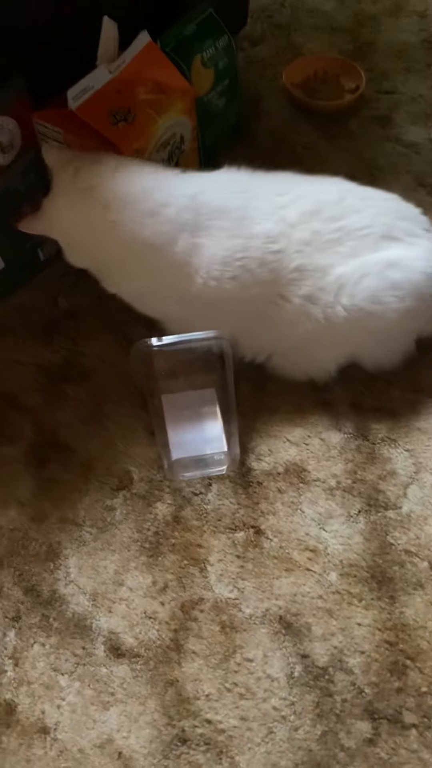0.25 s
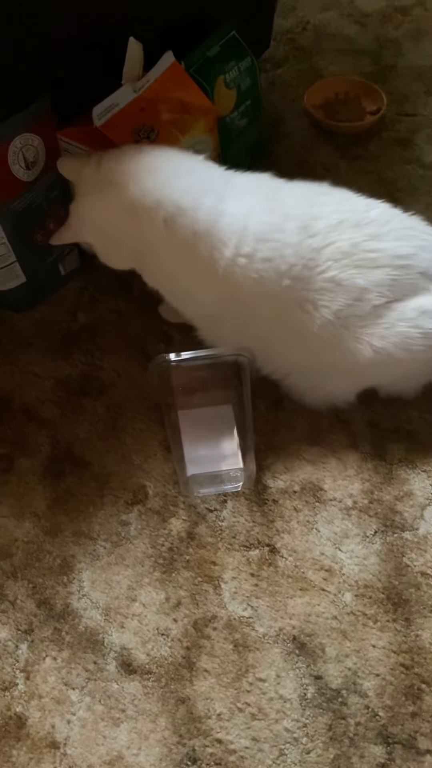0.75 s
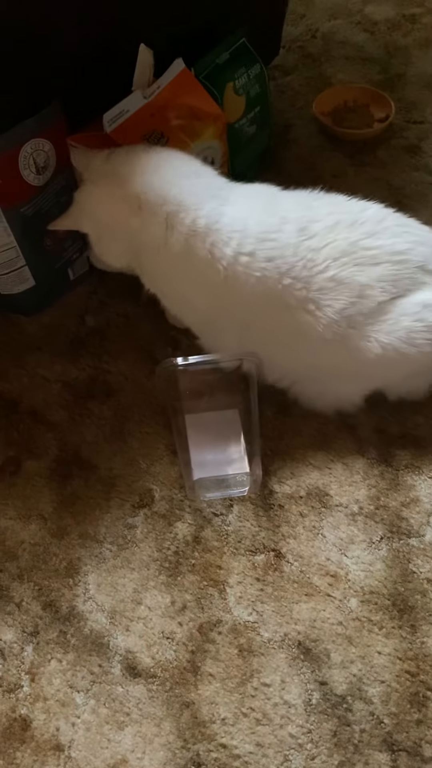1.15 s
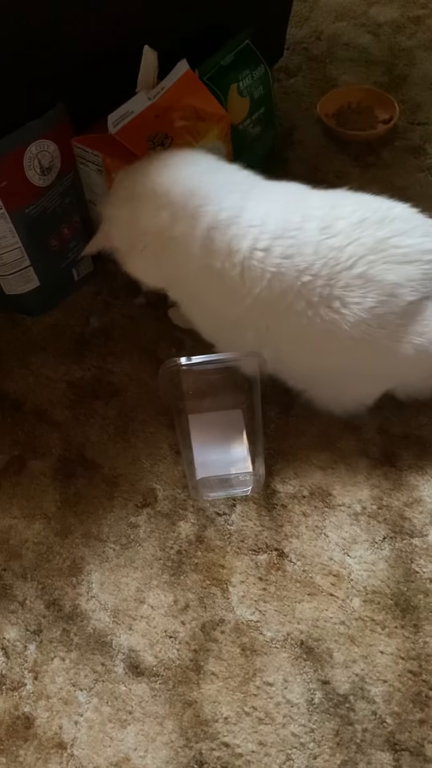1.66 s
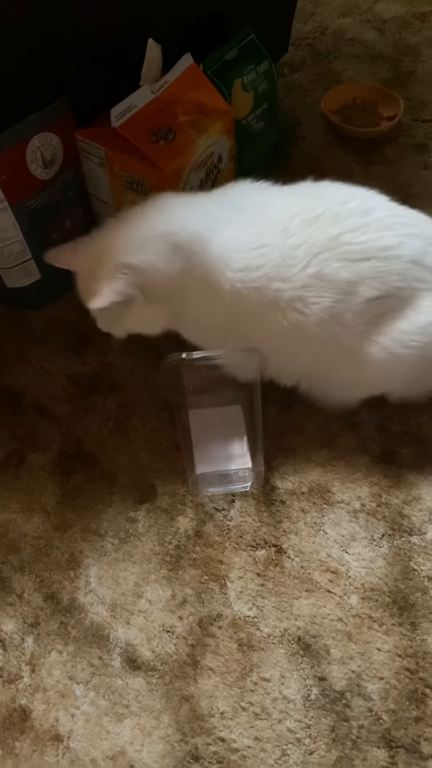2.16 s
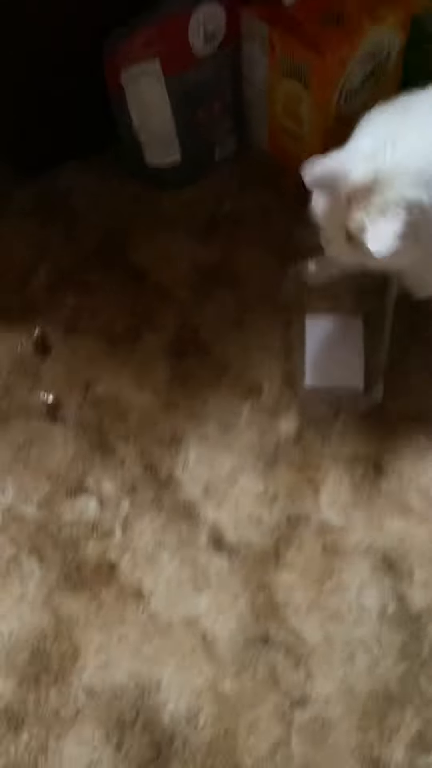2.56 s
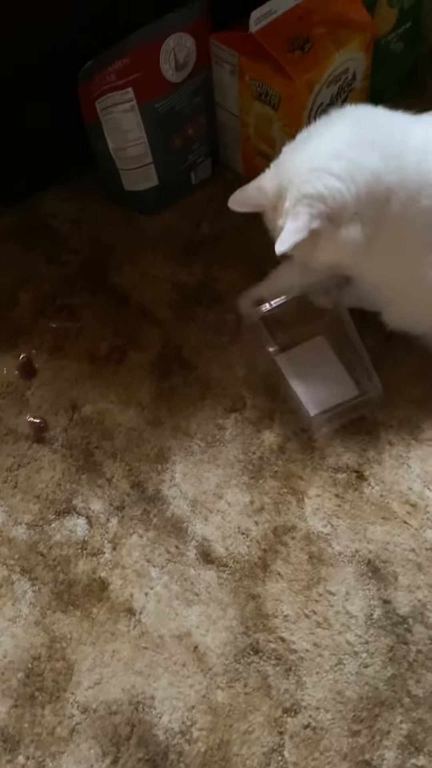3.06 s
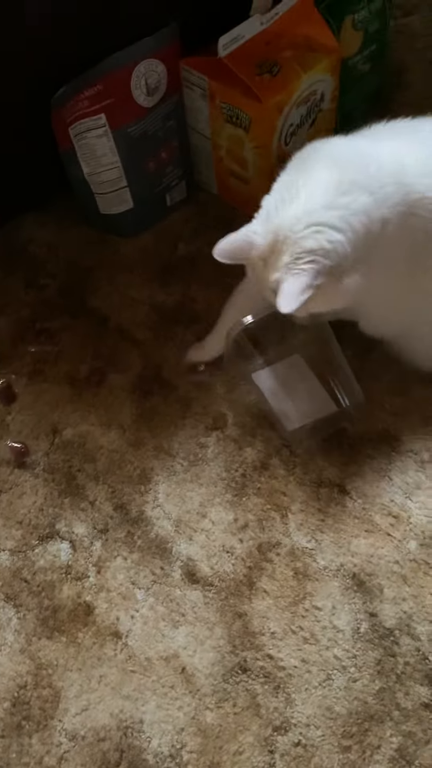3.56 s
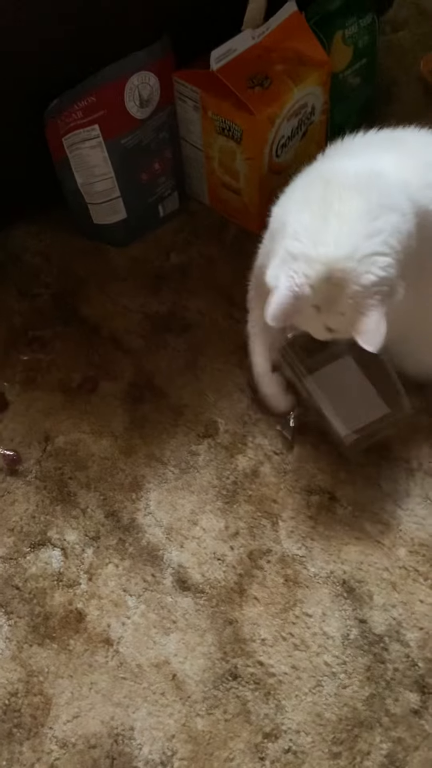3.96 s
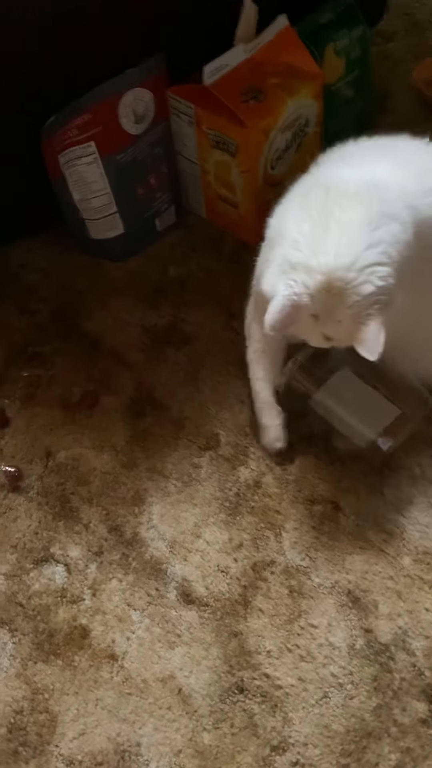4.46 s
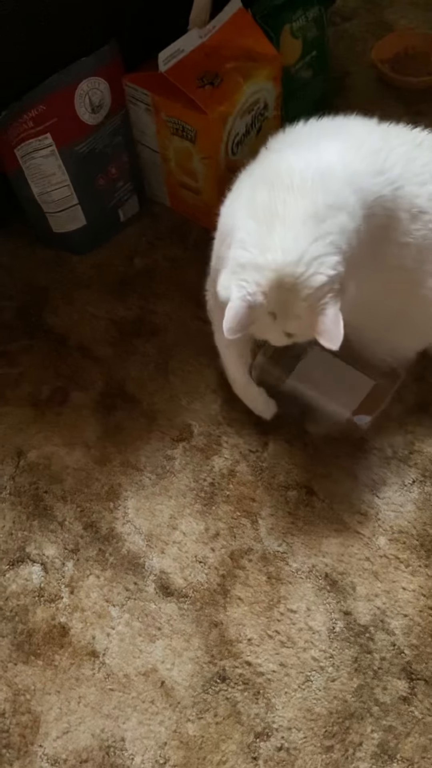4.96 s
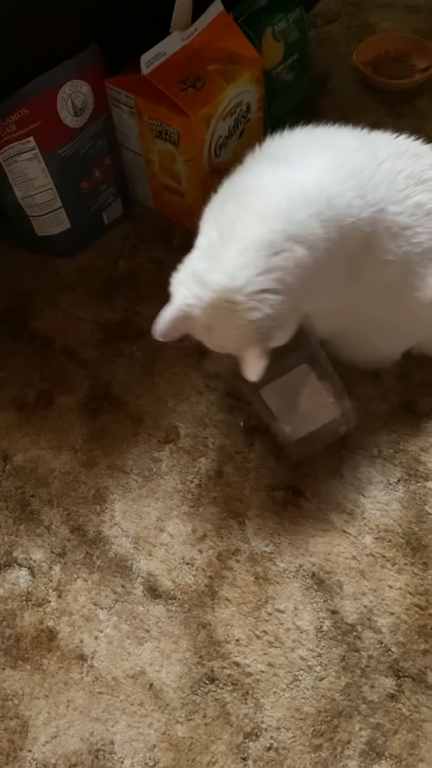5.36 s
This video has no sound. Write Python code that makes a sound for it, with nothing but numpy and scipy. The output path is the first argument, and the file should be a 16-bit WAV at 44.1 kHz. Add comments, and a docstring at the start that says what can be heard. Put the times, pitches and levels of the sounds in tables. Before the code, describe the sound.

A cat rummages among snack bags in a quiet room, heard close through a phone. A couple of crackles, a near pause, then dense crisp crinkling with faint paw bumps on a thin plastic box. It thins out before one loud, hard clack with a brief rattle. After a short lull, crackling and soft taps return, then fade into light rubbing over a low room tone.

```python
"""Close to a phone in a quiet room, a cat noses among snack bags: creases snap singly and in clumps as noise bursts.
From 0.7 s it also paws softly at a thin plastic box on the carpet: decaying sines for the walls and the bottom.
At 2.84 s comes one hard knock with a claw's crack, two low tones and a rattle, then a short lull in the film.
From 3.2 s film and soft bumps return; from 4.85 s fur and pads rub the box until the end.
Throughout, the walls reflect, fixed stereo processing sets left against right, and a noise room tone lies below."""
import sys
import numpy as np
from scipy import signal
from scipy.fft import rfft, irfft, next_fast_len
from scipy.io import wavfile
from scipy.ndimage import uniform_filter1d

SR = 44100
rng = np.random.default_rng(int(sys.argv[2]) if len(sys.argv) > 2 else 0)


def pcm_store(signal):
    """Save signal as 16-bit PCM."""
    levels = np.round(np.clip(np.atleast_2d(signal), -1, 1) * 32767)
    wavfile.write(sys.argv[1], SR, levels.astype(np.int16).T)


N = 246959  # samples, 5.6 s

# Creases that snap, and one rattle just after the hard knock (at 2.874 s): (time of the peak [s], level [dB],
# share under 2.5 kHz [dB], share over 6 kHz [dB], pitch of the ring [Hz])
SNAPS = [(0.0039, -26.5, -25, -20, 3830), (0.048, -35.5, -13, -6, 4900), (0.065, -40, -23, -9.5, 3800),
         (0.086, -38, -2, -7, 1480), (0.143, -49.5, -13, -16, 2050), (0.4902, -40, -22, -2, 2400),
         (0.4929, -39.5, -5.5, -11, 1260), (0.5226, -52, -5, -3, 1400), (0.7427, -30, -12, -13, 3580),
         (0.7475, -32.5, -8, -6, 1390), (0.7535, -28.5, -4.5, -4, 4690), (0.7583, -28, -20, -16, 4580),
         (0.7657, -34, -15, -11, 7620), (0.7742, -40, -15, 1, 4930), (0.7881, -37, -13, -8, 7390),
         (0.7939, -36.5, -8, -5, 5210), (0.8053, -35.5, -10, -8, 8940), (0.8123, -33, -27, -2, 2870),
         (0.8308, -32, -7.5, -1.5, 4670), (0.9009, -26.5, -5.5, -6.5, 1420),
         (0.9212, -26, -7.5, -3.5, 3900), (0.9442, -32, -31, -2, 8250), (0.97, -32.5, -6, -11, 2830),
         (0.9779, -45, -15, -8, 5050), (1.0259, -36, -14, -16, 4430), (1.0329, -32.5, -4, -11, 4750),
         (1.0475, -36.5, -2.5, -15, 3370), (1.051, -41, -13, -7, 3000), (1.0665, -44, -17, -2, 7410),
         (1.0797, -36, -5, -10, 1460), (1.1013, -42, -8, -3, 4780), (1.109, -29.5, -10, -1, 4570),
         (1.1236, -42, 5, -10, 1290), (1.1406, -41, -16, -1, 4910), (1.1524, -34.5, 11, -15, 1060),
         (1.1916, -32, -5, -3, 1190), (1.199, -34.5, -11, -3, 3300), (1.22, -38.5, -2, 3, 1190),
         (1.2256, -31, -7, -11, 5200), (1.2605, -39, -22, 4.5, 5830), (1.2834, -35.5, -8, -1, 8000),
         (1.2994, -24, -10, -3, 5460), (1.3084, -28.5, -7, 0, 1400), (1.3137, -36, -1, -4, 1440),
         (1.394, -36, -4, 3, 2230), (1.4793, -38, -7, -2, 4800), (1.503, -44, -13, 0, 7970),
         (1.5098, -37, -16, -1, 7600), (1.513, -37.5, -4, 1, 7400), (1.5327, -39, -15, 2, 8610),
         (1.5439, -38, -5, -1, 6890), (1.5549, -36.5, -4, 0.5, 6780), (1.565, -37, -1, 3, 7540),
         (1.581, -36, -3, 9, 1510), (1.5855, -29, -2, -2.5, 7750), (1.6016, -32, -8, 0, 8680),
         (1.618, -23.5, -4, 6, 9000), (1.6402, -42, 6, -4, 5000), (1.645, -34, -3.5, -5, 7740),
         (1.6564, -33.5, -5, -2, 7880), (1.661, -37, -6, 4, 1360), (1.679, -40, -26, -7, 7970),
         (1.684, -39, -28, 0, 5960), (1.71, -32, -15, -1.5, 5040), (1.7168, -32, -10.5, 0, 5490),
         (1.746, -35, -8, -1, 1490), (1.7527, -38, -29, 1, 8120), (1.766, -26, -8, -8.5, 7400),
         (1.783, -44.5, -9, -9, 1940), (1.8171, -22.5, -28, 1, 8700), (1.85, -37, -18, 2, 4610),
         (1.8591, -37, -10, -3, 4440), (1.8658, -32, -5, -3, 4600), (1.8906, -35, -8, -1.5, 4240),
         (1.905, -36.5, -10, -4, 9800), (1.948, -55, -2, -17, 1350), (1.984, -37.5, -4, -15, 1750),
         (1.9952, -29.5, -3, 0, 1560), (2.0045, -21.5, 1.5, 4, 2700), (2.04, -29, -10, -0.5, 1630),
         (2.1247, -37.5, -11, 0, 7100), (2.1382, -39.5, -2, -1, 2000), (2.1577, -39.5, -13, 1, 5340),
         (2.182, -43.5, -11, -2, 5300), (2.2447, -46.5, -6, -3.5, 7240), (2.2663, -51, 5, -16, 4110),
         (2.2725, -39, -6, -2, 2750), (2.2964, -49, -4, -3, 3160), (2.4322, -44.5, -6, -2, 1450),
         (2.4518, -35.5, -5, 6, 4840), (2.4634, -44, -3, -3.5, 2170), (2.524, -45.5, -7, 2, 4850),
         (2.538, -53.5, -8, 3, 5500), (2.649, -49, -18, -7, 3960), (2.709, -53, 3, -6, 1204),
         (2.7742, -28, -6, -2.5, 5330), (2.7847, -25, -11.5, 0, 7100), (2.79, -26, -4, -9, 1380),
         (2.7952, -35, -4, -1, 1240), (2.8133, -25, -11, 0, 5280), (2.8229, -30, -15, 0, 8950),
         (2.874, -28, -10, -2.5, 710), (3.2351, -40, -10, -2.5, 3785), (3.2655, -50, -10.5, -16.5, 2260),
         (3.303, -39.5, -8.5, -12, 7280), (3.313, -41.5, -15, -7, 7800), (3.3395, -39.5, -5.5, -2.5, 3850),
         (3.464, -34, -2.5, -18, 1185), (3.4683, -31, -20, -17, 5550), (3.4826, -29, -11, -20, 1240),
         (3.496, -34.5, -20, -7, 5650), (3.5051, -34, -15, -2, 8300), (3.5104, -34, -3.5, 0, 5400),
         (3.5646, -26, -11, -4, 5500), (3.603, -27, -7.5, -5.5, 6050), (3.61, -28, -6, -1, 5530),
         (3.6213, -28, -7, -8, 5700), (3.6339, -32.5, -5, -12, 1300), (3.6396, -33, -10, -6, 5160),
         (3.6453, -26, -14, 1, 5840), (3.6548, -27.5, -2.5, -8, 3300), (3.669, -29, -14, -7, 5400),
         (3.698, -34, -11, -1, 830), (3.745, -34.5, -22, -0.5, 6480), (3.7495, -40, -17, 1, 6290),
         (3.7547, -33, -17, -2, 3380), (3.7642, -39.5, -15, -9, 2800), (3.782, -26.5, -20, -2, 9500),
         (3.7879, -30, -15, -2, 2520), (3.794, -30, -3.5, -16, 2600), (3.802, -30.5, -13, 0.5, 10000),
         (3.8146, -32, -8, -2, 6960), (3.8305, -35, -18, 3, 7240), (3.837, -22.5, -7, -0.5, 710),
         (3.843, -27, -32, -7, 6940), (3.8532, -27, -15, -7, 7850), (3.8661, -41, -17, 4, 8100),
         (3.8717, -31.5, -8, -2.5, 2070), (3.8812, -35, -14, 2, 8480), (3.899, -34, -16, -2, 4080),
         (3.9046, -33.5, 1, -1, 1400), (3.9297, -36.5, -5, -8, 1360), (3.9414, -36.5, -3, -1, 2690),
         (3.9863, -29.5, -6.5, -4.5, 2630), (3.9929, -29.5, -20, 8, 4570), (3.9983, -32.5, -15, -0.5, 7650),
         (4.0111, -27.5, -2.5, -5, 1220), (4.018, -29, -10, -2, 8500), (4.0353, -26.5, -4, -3, 9400),
         (4.0592, -36, -8, -2, 4440), (4.066, -33.5, -2, 2, 7920), (4.079, -26, -8, -2, 4460),
         (4.1223, -33, -1.5, 2, 1400), (4.1947, -33, -28, -3, 7750), (4.206, -26, -6.5, -1, 3270),
         (4.275, -30.5, 3, -7, 1320), (4.293, -39, -2, -2, 2700), (4.307, -37, -7, -6, 3100),
         (4.3119, -31, -7, 0, 1400), (4.3305, -31.5, -5, -5, 7800), (4.364, -36, -20, 1.5, 7700),
         (4.3725, -42, -5.5, -2, 8420), (4.3892, -37.5, -14, -8, 7750), (4.4026, -31.5, -7, 1, 1340),
         (4.411, -23.5, -1.5, -5.5, 7960), (4.4155, -25.5, -19, -16, 4400),
         (4.4396, -27.5, -26, -1.5, 8030), (4.4501, -39, -14, -4, 710), (4.4652, -36, -13, 0, 7550),
         (4.4784, -37, -12, -10, 3980), (4.4875, -40.5, 6, -11, 2260), (4.492, -27, -0.5, 1.5, 8300),
         (4.5132, -40, -13, -11, 4070), (4.5241, -27.5, -21, -1.5, 8600), (4.556, -40.5, -2, -13, 3200),
         (4.5977, -40.5, -22, -2, 7970), (4.6342, -41, 0, -14.5, 1360), (4.646, -30.5, -4.5, -3, 5400),
         (4.6784, -37, -12, -2, 8200), (4.7028, -37, -20, -4, 2860), (4.7113, -31, -6.5, -9, 3960),
         (4.717, -31.5, -25, -1.5, 3870), (4.7245, -36, -1, -3, 700), (4.7304, -39.5, -8, -1, 8030),
         (4.748, -30.5, -19, -1, 7360), (4.7572, -34, -21, -4, 6740), (4.7656, -32, -9.5, -1, 3200),
         (4.7965, -28, -10, -2.5, 8500), (4.8059, -34, -7, -9, 8100), (4.8147, -24.5, -9.5, -6, 3980),
         (4.8343, -38, -16, 5, 8590), (4.8534, -42, -9, -2.5, 3120), (4.864, -37, -8.5, -1.5, 3290),
         (4.8713, -41.5, -16, 2, 2690), (4.8976, -38.5, -11, -1, 3980), (4.9056, -37, -6, -8, 8050),
         (4.916, -35, -3, -3, 1370), (4.9308, -47, -10, -11, 6720), (4.948, -33.5, -13, -5, 3900),
         (4.9567, -28.5, -5.5, -5, 7600), (4.965, -29.5, -8, -2, 7360), (4.9892, -42.5, -10, -2, 710),
         (4.9945, -46, -8, -3, 2370), (5.024, -43, -18, -2, 5560), (5.0424, -54, 1, -11, 1390),
         (5.0764, -43, -3.5, -2, 4270), (5.0817, -41.5, -15, -4, 8300), (5.098, -39.5, -18.5, 7, 8750),
         (5.109, -40, -6, -4, 3560), (5.145, -47, 6, -13, 800), (5.165, -47, -20, -13, 5130),
         (5.181, -51, 4, -3, 1340)]
# Handfuls of film crushed at once: (time of the peak [s], level [dB], length [ms], brightness [dB per octave])
CRUMPLES = [(0.002, -39, 24, -2.5), (0.753, -49, 37.8, 0), (0.831, -63, 9.8, 7), (0.914, -41, 26.4, -1.5),
            (0.974, -54.5, 38, 0), (1.028, -46.5, 36.6, 0.5), (1.087, -44, 24, -1), (1.155, -50.5, 50, -1),
            (1.193, -41.5, 14.5, -2), (1.224, -49, 14, 2.5), (1.304, -40.5, 31.3, -1),
            (1.419, -53.5, 60, -2), (1.518, -44.5, 19, 2.5), (1.6, -47.5, 57, 0), (1.651, -49.5, 23, 5),
            (1.682, -55.5, 84, 6.5), (1.751, -46, 50, 1), (1.855, -39, 24.5, 1), (1.997, -42, 26, 0),
            (2.041, -43, 11, -1.5), (2.142, -49, 21, 0), (2.268, -62, 9, 5), (2.451, -51.5, 41.7, -2.5),
            (2.499, -60, 23, -1), (2.535, -67, 19, -6), (2.644, -61.5, 22, 1.5), (2.696, -64, 44, -1.5),
            (2.798, -38, 46, -1), (3.239, -70.5, 15, 2), (3.306, -62.5, 58, 0), (3.477, -45, 41, 0.5),
            (3.566, -56, 13, -3), (3.65, -43, 75, -0.5), (3.767, -62, 41, -3.5), (3.803, -47.5, 44, 0),
            (3.851, -42.5, 72, -1.5), (3.903, -45, 11, 1), (4.009, -43, 39.5, -1.5),
            (4.202, -39.5, 19.4, 0.5), (4.312, -48.5, 29, 0), (4.41, -40, 21.5, -0.5),
            (4.493, -45.5, 84, 0), (4.644, -45, 37.6, -1), (4.711, -49.5, 49, 0.5), (4.754, -55, 13, 7),
            (4.815, -46.5, 41, 0), (4.926, -44.5, 16, 2), (4.963, -53, 21, 0.5), (5.079, -67, 9.3, 2),
            (5.164, -59.5, 45, 4), (5.251, -63.5, 60, 1)]
# Faint rustle under everything: (time [s], level [dB])
RUSTLE = [(0, -47.5), (.11, -72), (.2, -105), (.68, -82), (.78, -82), (1.35, -62), (1.7, -57.5),
          (1.97, -73), (2.25, -76.5), (2.4, -86.5), (2.46, -66.5), (2.75, -78.5), (2.87, -44), (3.12, -80),
          (3.43, -76), (3.7, -59), (4.15, -69.5), (4.5, -63), (5.29, -66.5), (5.37, -76), (5.6, -68.5)]
# Colour of the film: (frequency [Hz], level [dB per Hz])
CRINKLE = [(200, -8.5), (350, -5.5), (600, -3.5), (900, -5.5), (1300, -3.5), (2000, -2.5), (2800, -1),
           (4000, 0), (5500, -3), (7500, -1), (10000, -5.5), (13000, -7), (15500, -14)]
# Pitch ranges of the tiny creases, each of which favours one: (frequency [Hz])
CREASE_HZ = [1400, 2700, 4840, 8100, 10300]
# Blows on the box: (time [s], strength [dB], drum of the bottom [dB], contact [ms], main wall mode [Hz],
# bottom [Hz], damping by the paw [factor on the speed of decay])
BUMPS = [(0.748, -44, -12.5, 2.3, 527, 127, 1.6), (0.9, -37, -15, 2.4, 546, 125, 5.1),
         (1.078, -58.5, 3.5, 1.4, 500, 122, 1.1), (1.189, -54, -7, 1.9, 514, 126, 1.8),
         (1.298, -39, -7.5, 4.3, 533, 141, 2.8), (1.52, -42, -14.5, 3.6, 543, 123, 3.6),
         (1.739, -55, 3, 1.4, 554, 119, 2.3), (1.846, -46, -7, 2.9, 527, 118, 2.1),
         (2.002, -37, -27, 0.77, 543, 125, 4.7), (2.043, -55, -25, 3, 488, 125, 3.8),
         (2.432, -48.5, -5, 5.3, 500, 119, 0.97), (2.773, -33, -29, 4.1, 525, 123.5, 2.8),
         (2.8436, -6.5, -29, 1.0, 520, 127, 1.0), (2.889, -23.5, -24, 1.2, 521, 127, 1.2),
         (2.984, -57, 12, 1.5, 505, 161.6, 0.91), (3.644, -42.5, -0.5, 2.9, 514, 127.4, 0.66),
         (3.811, -31.5, -4.5, 1.1, 526, 125.2, 2), (4.203, -48.5, -2.5, 0.76, 518, 123, 1),
         (4.403, -41, -13, 0.64, 507, 121.6, 0.63), (4.45, -39.5, -11.5, 0.66, 559, 153, 1.56),
         (4.682, -47, -2, 0.93, 514, 121, 3.2), (4.896, -57, -26, 1, 575, 123, 1.3),
         (5.1445, -39.5, -31, 0.2, 544, 109.7, 3.1), (5.2343, -43.5, -26.5, 0.49, 518, 118.5, 1.8),
         (5.305, -47.5, -22.5, 1.5, 517, 122, 1.7), (5.521, -65, 11, 1.4, 517, 92, 1.6)]
# Modes of the box walls before the paw shifts them: (frequency [Hz])
BOX_HZ = [318, 382, 427, 468, 520, 586, 665, 780, 912, 1034, 1660, 2100, 3300, 5300, 6600]
# Strength and undamped ring of those modes: (level [dB], t60 [s])
BOX_RING = [(-14, .15), (-11, 0.064), (-2, 0.16), (-9, 0.14), (0, 0.09), (0.5, 0.13), (2, 0.04), (4, 0.035),
            (-1, 0.045), (-10, 0.08), (-15, 0.018), (-13, .02), (-7.5, .012), (-6.5, .012), (-6, .01)]
# Colour of the many small wall modes, merged: (frequency [Hz], level [dB per Hz])
THUD = [(150, -33), (260, -36), (400, -14), (600, 2.5), (800, 0.5), (1200, -12), (5000, -38.5)]
# Claw meets the wall of the box: (time of the peak [s], peak level [dB], decay [ms])
CRACK = (2.8447, -3, 1.5)
# Colour of that crack: (frequency [Hz], level [dB per Hz])
CRACK_COLOUR = [(300, -26.5), (1000, -17.5), (2000, 0.5), (3500, -2.5), (6000, 4), (8000, -5),
                (11000, -1.5), (15000, -13)]
# Low tones that linger after the hard knock: (frequency [Hz], level [dB], t60 [s])
BOOM = [(157.3, -28, 0.44), (192, -28, 0.4)]
# Fur and pads drag along the box: (time [s], level [dB])
RUB = [(4.85, -66), (4.99, -62), (5.054, -81), (5.14, -62), (5.225, -69), (5.236, -54.5), (5.31, -67),
       (5.39, -74), (5.412, -75.5), (5.451, -74.5), (5.487, -65.5), (5.53, -76), (5.57, -77), (5.6, -79.5)]
# Colour of the box while it is rubbed: (frequency [Hz], level [dB])
RUB_COLOUR = [(250, -25), (450, -16), (575, 5), (690, -12), (800, -3), (950, -10), (1500, -18)]
# Share of the film sent to the walls of the room: (frequency [Hz], level [dB])
FILM_ECHO = [(300, -10), (1500, -15.5), (6000, -17.5), (10000, -26), (14000, -30)]
# Share of the box sent to the walls of the room: (frequency [Hz], level [dB])
BOX_ECHO = [(130, -19), (280, -10.5), (450, -8), (900, -12), (1800, -11.5), (6000, -18), (10000, -23.5),
            (14000, -35)]
# Decay of the reflections: (frequency [Hz], t60 [s])
WALLS = [(150, 0.49), (500, 0.23), (2000, 0.23), (6000, 0.23), (14000, 0.079)]
# Left-right likeness of the reflections: (frequency [Hz], likeness [0-1])
WALLS_SAME = [(150, 1), (400, 0.31), (1000, 0.051), (9000, 0.11), (14000, 0.8)]
# Lag of the right channel in the stereo processing: (frequency [Hz], phase [radians])
STEREO_LAG = [(0, 0), (520, 0.3), (1210, 4.7), (1810, 5.0), (2500, 7.5), (2930, 10.5), (3190, 10.7),
              (3450, 11.3), (3790, 8.0), (4050, 7.7), (4570, 9.3), (5080, 9.7), (5600, 12.6), (6370, 13.5),
              (11700, 15.6), (16500, 15.7)]
# Left channel over the right in the stereo processing: (frequency [Hz], level [dB])
STEREO_BALANCE = [(150, 0.5), (500, 4.5), (1000, 13.5), (1700, 4.5), (2000, -2.5), (2700, 3), (3800, -7),
                  (5000, 4.5), (7000, 0)]
# Colour of the room tone: (frequency [Hz], level [dB per Hz])
ROOM_TONE = [(25, -7), (45, -5.5), (75, 5.5), (120, -1.5), (170, -14), (250, -20.5), (500, -25.5),
             (1000, -35.5), (2000, -37), (4000, -42), (8000, -42.5), (10000, -57), (12000, -51.5),
             (16000, -63)]
# Left-right likeness of the room tone: (frequency [Hz], likeness [0-1])
ROOM_SAME = [(100, 0.98), (200, 0.75), (400, 0.19), (1000, 0.088), (16000, 0.33)]

FILM_SAME = 0.75  # creases lie in many directions: left-right likeness of their sound
# Body of a snap: basic decay, random spread (natural log), and what a wide dull fold adds
SNAP_MS, SNAP_SPREAD, DULL_MS = 1.35, 0.2, 0.9
TICK_MS, TICK_DB = 0.31, 4  # the sharp instant at which a crease gives way, over the body of the snap
# The facet beside a crease rings: level over the plain snap, width as a share of pitch, and width added to it
RING_DB, RING_WIDTH, RING_WIDTH_HZ = 6, 0.066, 260
SNAP_FLOOR_HZ = 560  # a crease is too small to sound much below this
SWELL_SHARE, SQUARENESS = 0.51, 4.2  # part of a handful's length spent swelling; how abruptly it starts and stops
SETTLE_DB, SETTLE_DB_PER_S = -9.5, 299  # the released film unfolds again, faintly
RUSTLE_TILT_DB = -1.04  # per octave
CREASE_OCTAVES, CREASE_LIFT_DB = 0.14, 15  # width and height of a tiny crease's pitch range
DRUM_T60_S = 0.35  # undamped ring of the flat bottom of the box
DRUM_SLACK, DRUM_SLACK_S = 0.12, 0.015  # under the paw the bottom starts flat by this share and recovers
# The box rocks on the pile of the carpet: rms swing of the bottom's level, and of its pitch as a share
ROCK_DB, ROCK_BEND = 2.5, 0.035
BOOM_SWELL_S = 0.013
ROOM_TONE_DB = -64.5  # rms
EDGE_HZ = 16500


def snaps():
    """Each snap is a short noise burst; a wide fold is dull and longer, a tight one bright."""
    size = 2048
    out, hz = np.zeros((2, N + size)), np.fft.rfftfreq(size, 1 / SR)
    low = 1 / (1 + (hz / 2500) ** 6)
    high = 1 / (1 + (6000 / (hz + 1)) ** 6)
    floor = 1 + (SNAP_FLOOR_HZ / (hz + 1)) ** 4
    bands = evened(gain_of(read(CRINKLE, hz)) * np.array([low / floor, 1 - low - high, high]))
    for s, db, low_db, high_db, ring_hz in SNAPS:
        # doubled dB turn a gain into a power: the middle band takes the power left over
        middle = np.sqrt(max(1 - gain_of(2 * low_db) - gain_of(2 * high_db), .05))
        colour = np.array([gain_of(low_db), middle, gain_of(high_db)]) @ bands
        decay_ms = SNAP_MS * np.exp(SNAP_SPREAD * rng.standard_normal())
        body = burst(decay_ms + DULL_MS * min(gain_of(low_db), 1), size)
        shape = (body + gain_of(TICK_DB) * burst(TICK_MS, size)) / 2
        width_hz = RING_WIDTH * ring_hz + RING_WIDTH_HZ
        ring = 1 + gain_of(RING_DB) / (1 + 2j * (hz - ring_hz) / width_hz)
        snap = irfft(rfft(pair((size,)) * shape) * ring * colour)
        snap *= np.linalg.norm(shape) / np.linalg.norm(snap) * np.sqrt(2)
        add(out, s, gain_of(db) * snap)
    return out[:, size // 2:][:, :N]  # puts the peaks on their times


def rustle():
    """The faint bed of film and the crushed handfuls, which swell and fade quickly, then settle."""
    t = np.arange(N) / SR
    bed_level = gain_of(np.interp(t, *np.transpose(RUSTLE)))
    bed = creases(bed_level, np.full(N, RUSTLE_TILT_DB), per_s=2500, spread_db=8.5, smooth=2.8)
    power, bright = np.full(N, 1e-14), np.zeros(N)
    for s, db, length_ms, tilt_db in CRUMPLES:
        span = np.where(t < s, SWELL_SHARE, 1 - SWELL_SHARE) * length_ms / 1000
        drop_db = np.minimum(6 * abs((t - s) / span) ** SQUARENESS, 120)
        hand = gain_of(2 * (db - drop_db))
        hand += (t > s) * gain_of(2 * (db + SETTLE_DB - SETTLE_DB_PER_S * abs(t - s)))
        power += hand
        bright += hand * tilt_db
    return bed + creases(np.sqrt(power), bright / power, per_s=910, spread_db=6.5, smooth=0.59)


def creases(level, tilt_db, per_s, spread_db, smooth):
    """Many tiny creases of random size and pitch over a smooth scrape, at a given level and brightness."""
    sizes = gain_of(spread_db * np.minimum(rng.exponential(1, N), 3))
    sizes *= rng.random(N) < per_s / SR
    kind = rng.integers(0, len(CREASE_HZ), N) == np.arange(len(CREASE_HZ))[:, None]
    ticks = signal.oaconvolve(sizes * kind, burst(0.2, size=300)[None], "same", axes=1)
    ticks /= np.sqrt(uniform_filter1d(ticks.sum(0) ** 2, 1500) + 1e-9)  # evens out the local loudness
    white = pair((N,))
    hz, frame_s, z = signal.stft(smooth * white, SR, nperseg=256)
    for tick, centre in zip(ticks, CREASE_HZ):
        octaves = np.log2((hz + 1) / centre)
        lift = gain_of(CREASE_LIFT_DB * np.exp(-(octaves / CREASE_OCTAVES) ** 2))
        z = z + signal.stft(tick * white, SR, nperseg=256)[2] * evened(lift)[:, None]
    z = z * evened(gain_of(read(CRINKLE, hz)))[:, None] / np.sqrt(1 + smooth ** 2)
    frame_tilt = np.clip(np.interp(frame_s, np.arange(N) / SR, tilt_db), -8, 8)
    tilt = gain_of(np.outer(np.log2((hz + 200) / 4000), frame_tilt))
    return signal.istft(z * tilt, SR, nperseg=256)[1][:, :N] * level


def pair(size):
    """White noise for the two channels, nearly alike."""
    a, b = rng.standard_normal((2, *size))
    return np.stack([a, FILM_SAME * a + np.sqrt(1 - FILM_SAME ** 2) * b], -2)


def box():
    """All blows of the paw on the box, and the claw's crack."""
    out, t = np.zeros(N), np.arange(SR // 2) / SR
    for s, blow_db, drum_db, contact_ms, wall_hz, drum_hz, damping in BUMPS:
        rings = box_walls(t, contact_ms, wall_hz, damping)
        drum = box_bottom(t, drum_db, drum_hz, damping)
        add(out, s, gain_of(blow_db) * (0.42 * rings + drum))
    add(out, CRACK[0] - 1024 / SR, claw_crack(2048))
    return out


def box_walls(t, contact_ms, wall_hz, damping):
    """Ringing wall modes over a merged thud; long soft contact leaves only the low modes."""
    spot, turn = rng.standard_normal((2, len(BOX_HZ), 1))  # the place hit changes the strengths and phases
    db, t60 = np.transpose(BOX_RING)[:, :, None]
    hz = np.c_[BOX_HZ] * wall_hz / BOX_HZ[4]  # pressure on the walls shifts all modes together
    rings = gain_of(db + 1.2 * spot - 60 * damping * t / t60) * np.sin(2 * np.pi * hz * t + 0.3 * turn)
    rings = (rings / (1 + (hz * contact_ms / 1000) ** 2)).sum(0)
    thud = evened(coloured(rng.standard_normal(len(t)), THUD)) * gain_of(-60 * t / 0.14)
    thud *= gain_of(-60 * (damping - 1) * t / .16)
    sound = rings / np.std(rings[:900]) + .6 * thud
    return sound * (1 - np.exp(-(t / .0012) ** 2))  # the pad sinks in over a moment


def box_bottom(t, drum_db, drum_hz, damping):
    """The flat bottom drums as one low decaying tone; rocking bends its pitch and level."""
    rock = uniform_filter1d(uniform_filter1d(rng.standard_normal(len(t)), 700), 700)
    rock = evened(rock)
    bend = ROCK_BEND * rock - DRUM_SLACK * np.exp(-t / DRUM_SLACK_S)
    tone = np.sin(2 * np.pi * drum_hz * (t + np.cumsum(bend) / SR))
    decay = gain_of(drum_db - 60 * damping * t / DRUM_T60_S)
    onset = 1 - np.exp(-t / 0.0025)
    return decay * onset * tone * gain_of(ROCK_DB * rock)


def claw_crack(size):
    """A hard claw on thin plastic: one coloured noise burst, peaking near its middle."""
    _, crack_db, decay_ms = CRACK
    crack = coloured(rng.standard_normal(size) * burst(decay_ms, size, rise_share=0.6), CRACK_COLOUR)
    return gain_of(crack_db) * crack / abs(crack).max()


def boom():
    """Two low tones swell and decay together after the hard knock."""
    out, t = np.zeros(N), np.arange(SR // 2) / SR
    tones = sum(gain_of(db - 60 * t / t60) * np.sin(2 * np.pi * hz * t) for hz, db, t60 in BOOM)
    add(out, CRACK[0], (1 - np.exp(-t / BOOM_SWELL_S)) * tones)
    return out


def rub(damping=1.3, patchy_db=4):
    """Uneven friction shakes the middle modes of the box, damped by the paw that rests on it."""
    t = np.arange(N) / SR
    s, level_db = np.transpose(RUB)
    patches = evened(uniform_filter1d(uniform_filter1d(rng.standard_normal(N), 400), 400))
    friction = rng.standard_normal(N) * gain_of(patchy_db * patches)
    ring_s, ring = t[:8000], np.zeros(8000)
    for hz, (db, t60) in zip(BOX_HZ, BOX_RING):
        ring += gain_of(db - 60 * damping * ring_s / t60) * np.sin(2 * np.pi * hz * ring_s)
    drag = evened(signal.oaconvolve(friction, coloured(ring, RUB_COLOUR))[:N])
    return drag * gain_of(np.interp(t, s, level_db, left=-120))


def walls(first_ms=3.):
    """Sparse reflections of random sign, partly other ones for each channel, each band dying at its own speed."""
    taps, start = np.zeros((2, SR // 2)), round(first_ms * SR / 1000)
    slots = np.arange(start, SR // 2 - 20, 20)  # one reflection in every 20 samples
    at = slots + rng.integers(0, 20, (2, len(slots)))
    np.put_along_axis(taps, at, rng.choice([-1., 1.], at.shape), 1)
    hz, t, z = signal.stft(taps, SR, nperseg=256)
    same = read(WALLS_SAME, hz)[:, None]
    z = np.array([z[0], same * z[0] + np.sqrt(1 - same ** 2) * z[1]])
    decay = gain_of(-60 * t / read(WALLS, hz)[:, None])
    tail = signal.istft(z * decay, SR, nperseg=256)[1]
    return tail / np.linalg.norm(tail[0])


def stereo_processing(x):
    """A fixed stereo processing sets the level balance and the phase lag of the right channel against the left."""
    size = next_fast_len(N + 4096)
    hz = np.fft.rfftfreq(size, 1 / SR)
    ratio = gain_of(read(STEREO_BALANCE, hz))
    left = np.sqrt(2 / (1 + ratio ** -2))  # both channels together keep the power
    right = left / ratio * np.exp(-1j * np.interp(hz, *np.transpose(STEREO_LAG)))
    return irfft(rfft(x, size) * np.array([left, right]), size)[:, :N]


def room_tone():
    """Lumpy low rumble of the house over a faint hiss: coloured noise, partly alike in the two channels."""
    frames, hz = N // 512 + 5, np.fft.rfftfreq(2048, 1 / SR)
    a, b, c, d, patches = rng.standard_normal((frames, 1025, 5)).T
    patches = uniform_filter1d(uniform_filter1d(patches, 8, 0), 6, 1)
    patches = evened(patches.ravel()).reshape(patches.shape)
    same, left = read(ROOM_SAME, hz)[:, None], a + 1j * b
    z = np.array([left, same * left + np.sqrt(1 - same ** 2) * (c + 1j * d)])
    z *= gain_of(read(ROOM_TONE, hz)[:, None] + 0.5 * patches)
    tone = signal.istft(z, nperseg=2048, noverlap=1536)[1][:, :N]
    return gain_of(ROOM_TONE_DB) * evened(tone)


def gain_of(db):
    """dB to gain."""
    return 10 ** (np.asarray(db) / 20)


def evened(x):
    """Scales the last axis to rms 1."""
    return x / np.sqrt(np.mean(x ** 2, -1, keepdims=True) + 1e-20)


def read(points, hz):
    """Reads a spectrum on a log-frequency axis."""
    f, value = np.transpose(points)
    return np.interp(np.log(hz + 1), np.log(f + 1), value)


def add(mix, s, sound):
    """Mixes a sound in at s seconds."""
    part = mix[..., max(round(s * SR), 0):][..., :sound.shape[-1]]
    part += sound[..., :part.shape[-1]]


def coloured(x, points):
    """Filters the last axis by a spectrum table."""
    hz = np.fft.rfftfreq(x.shape[-1], 1 / SR)
    return irfft(rfft(x) * gain_of(read(points, hz)), x.shape[-1])


def burst(decay_ms, size, rise_share=0.62):
    """Envelope of a snap with its peak in the middle: it rises faster than it falls."""
    ms = (np.arange(size) - size // 2) / SR * 1000
    return np.exp(-abs(ms) / decay_ms / np.where(ms < 0, rise_share, 1))


def scene():
    """Film and box with their reflections through the stereo processing, over the room tone."""
    film, knocks = snaps() + rustle(), box() + rub()
    to_room = coloured(film[0], FILM_ECHO) + coloured(knocks, BOX_ECHO)
    reflections = signal.fftconvolve(to_room[None], walls(), axes=1)[:, :N]
    return stereo_processing(film + knocks + boom() + reflections) + room_tone()


def record(dry):
    """The microphone loses the deepest bass; then the band limit."""
    dry = signal.sosfilt(signal.butter(2, 40, "high", fs=SR, output="sos"), dry)
    band_limit = signal.firwin(511, EDGE_HZ, window=("kaiser", 12), fs=SR)
    return signal.oaconvolve(dry, band_limit[None], "same")


dry = scene()
out = record(dry)
pcm_store(out)
```